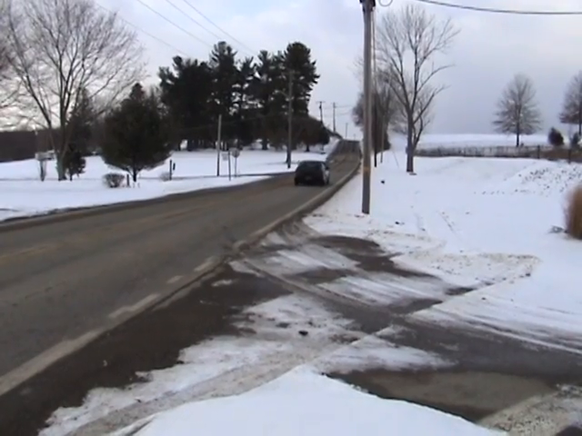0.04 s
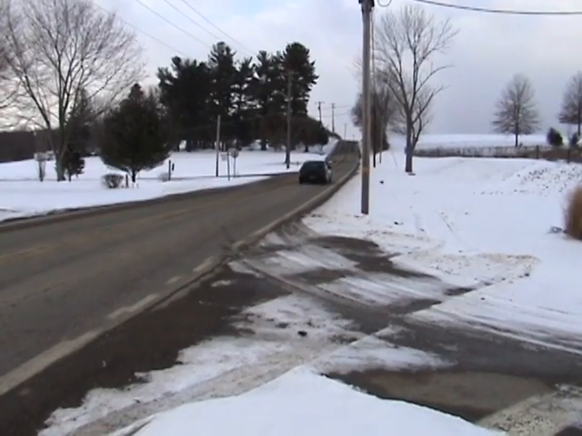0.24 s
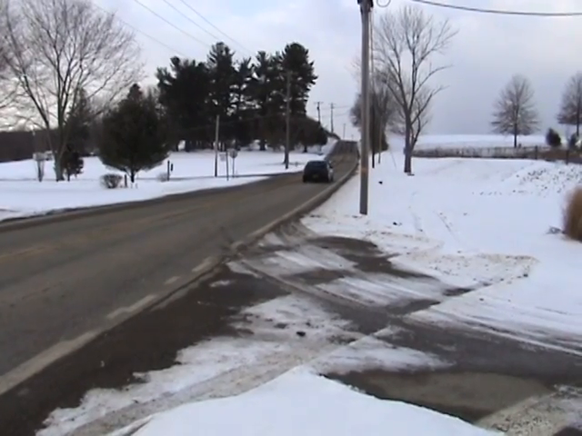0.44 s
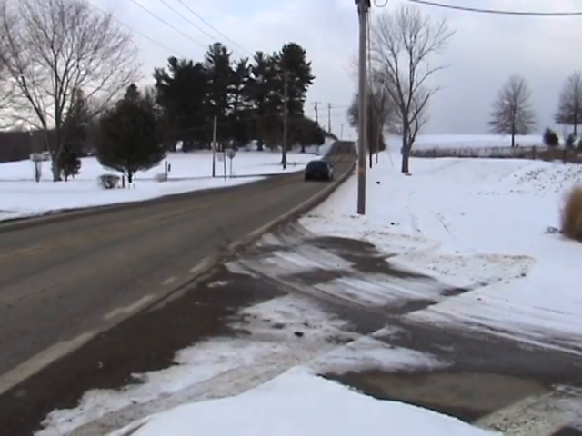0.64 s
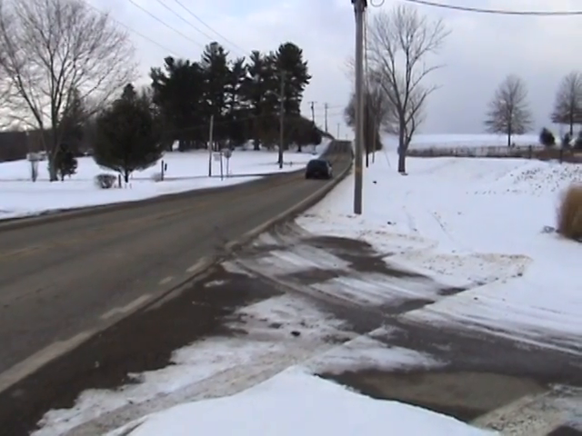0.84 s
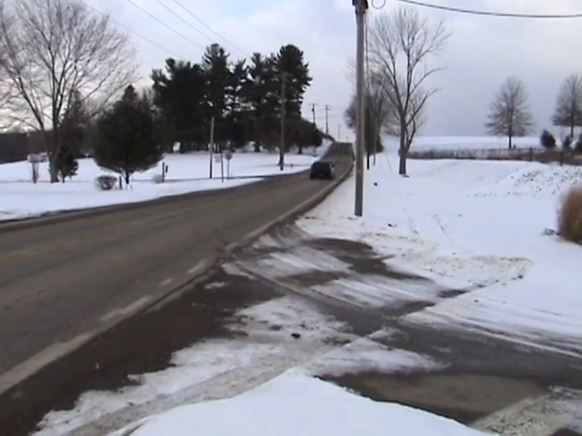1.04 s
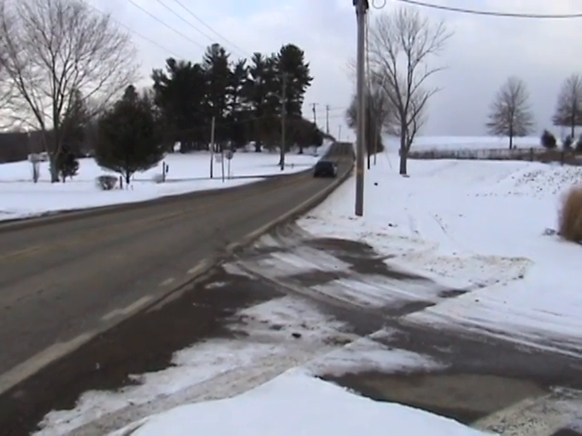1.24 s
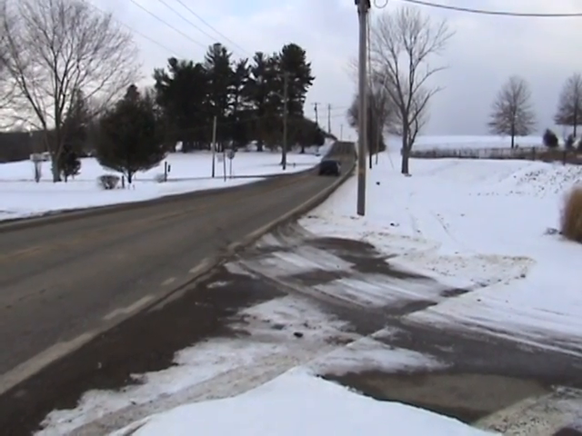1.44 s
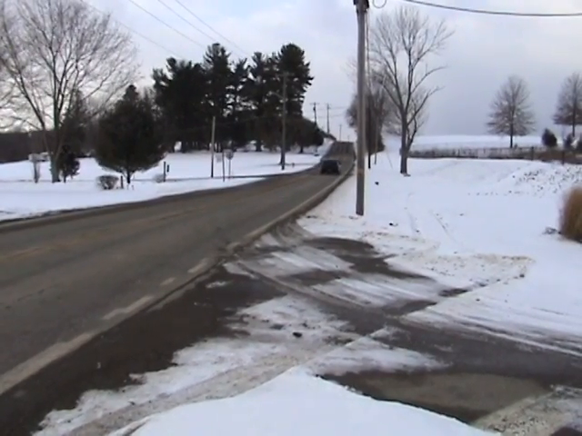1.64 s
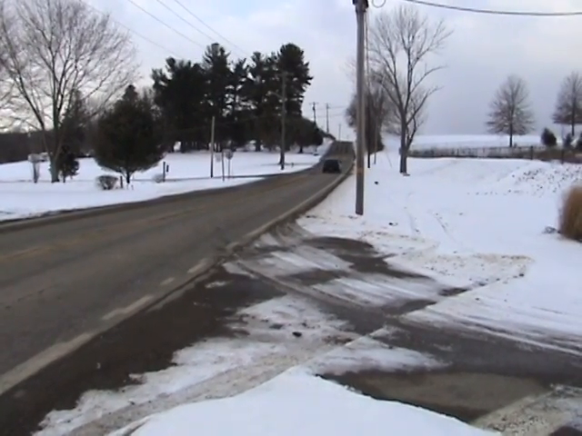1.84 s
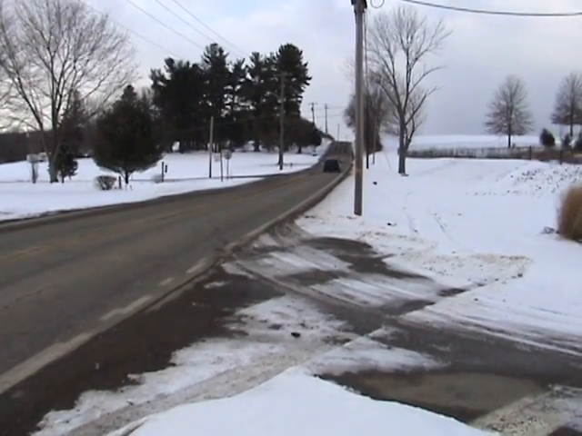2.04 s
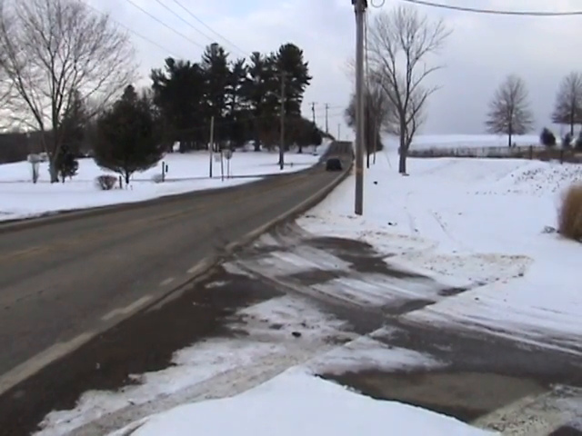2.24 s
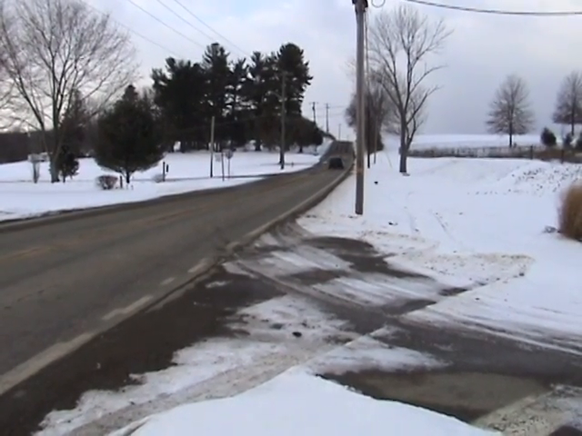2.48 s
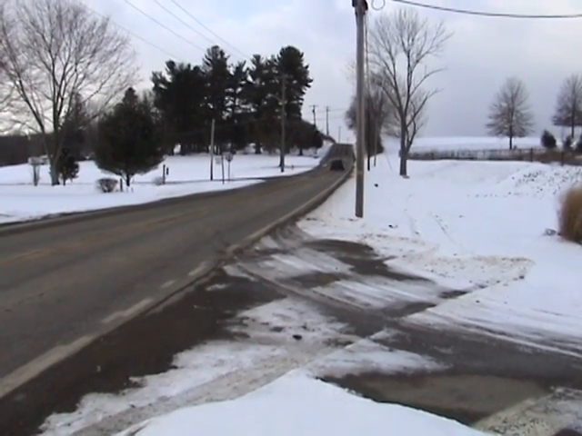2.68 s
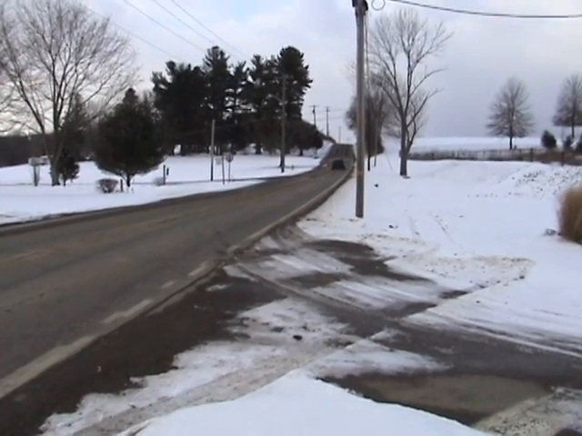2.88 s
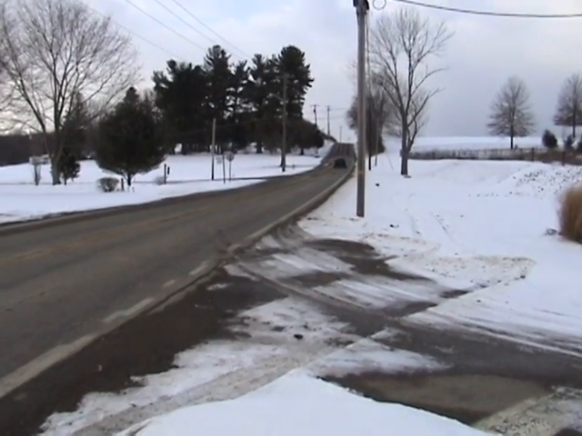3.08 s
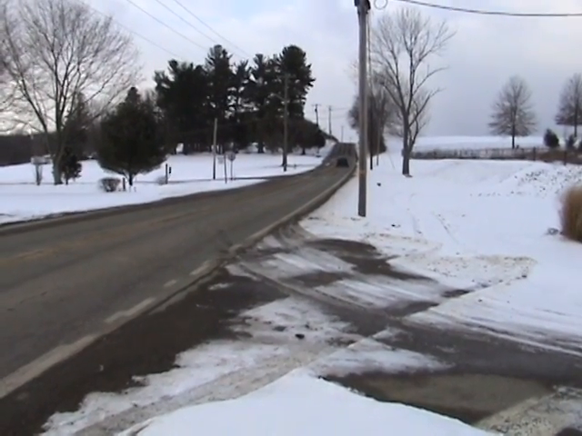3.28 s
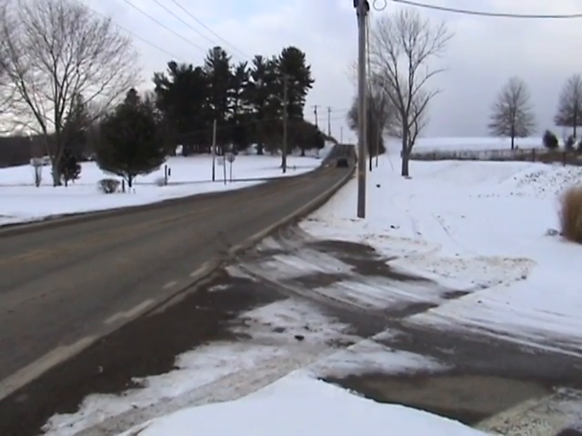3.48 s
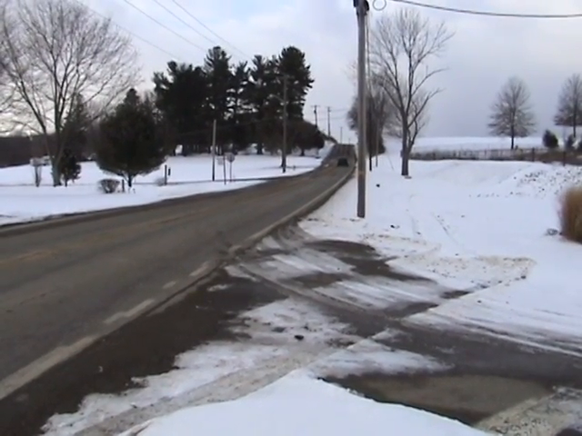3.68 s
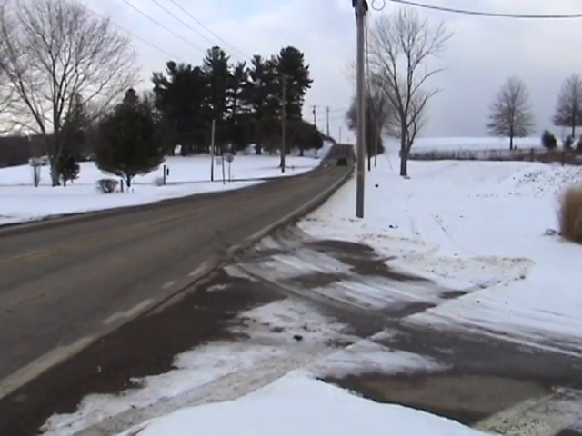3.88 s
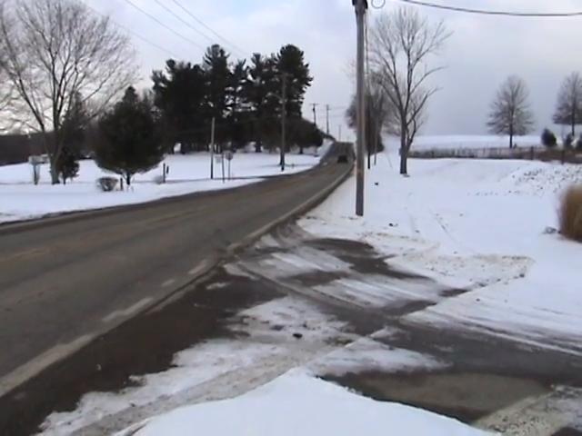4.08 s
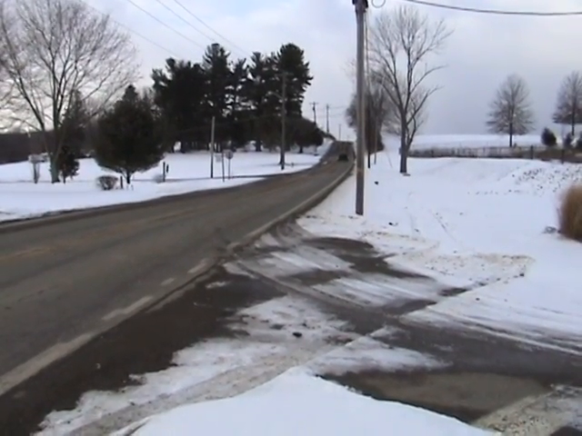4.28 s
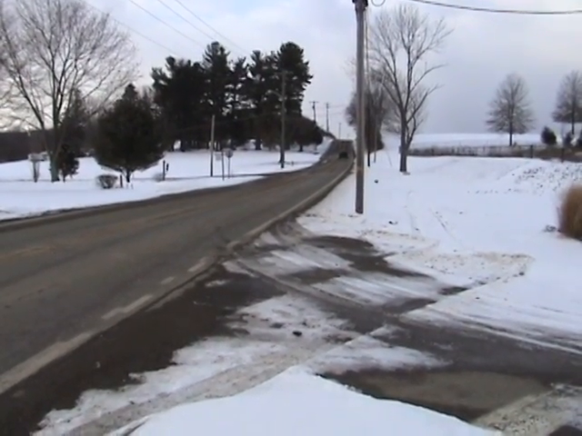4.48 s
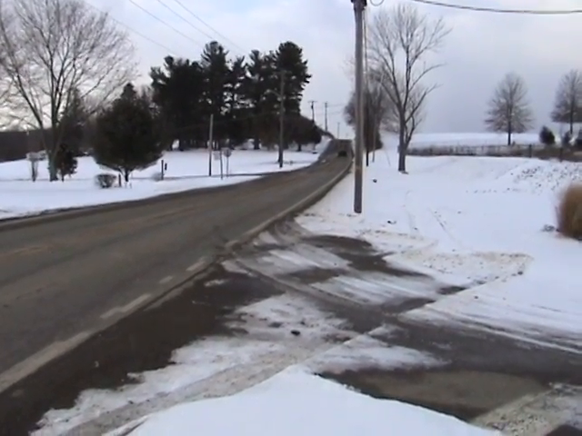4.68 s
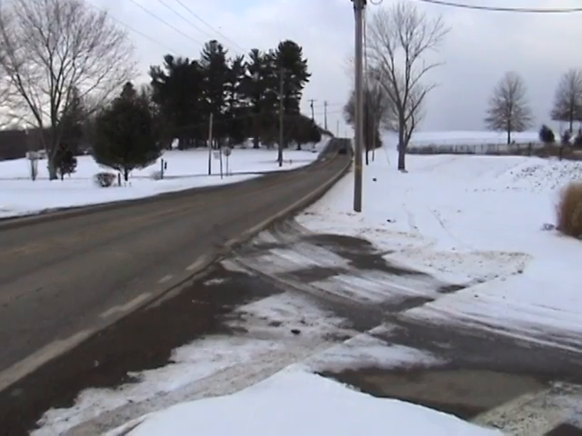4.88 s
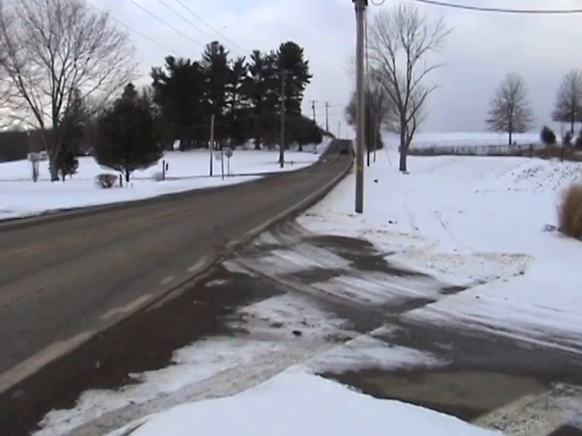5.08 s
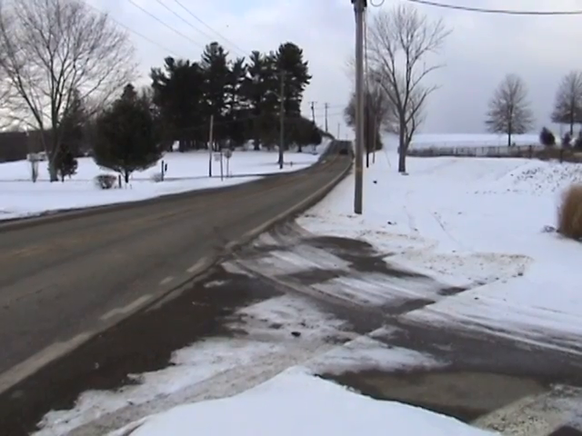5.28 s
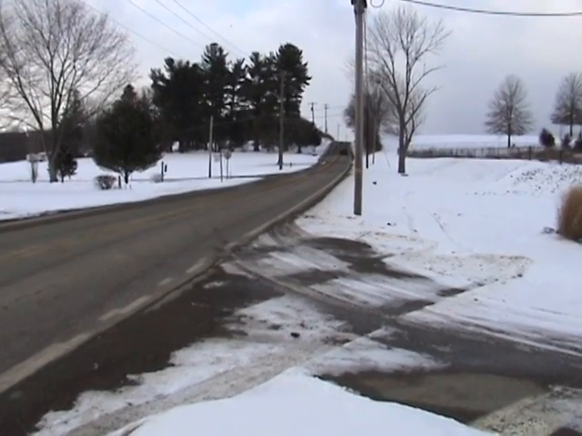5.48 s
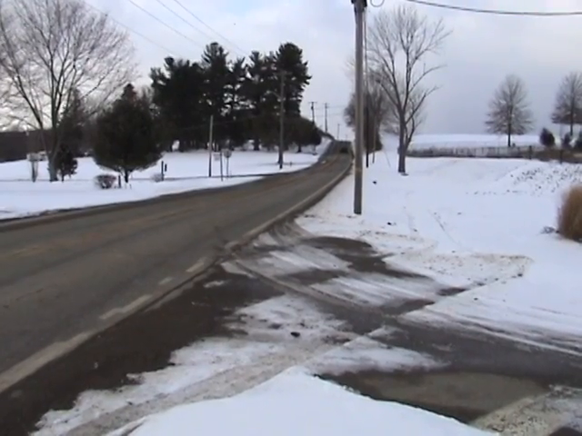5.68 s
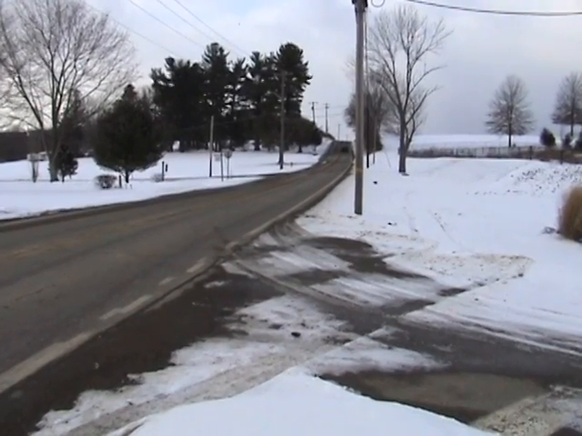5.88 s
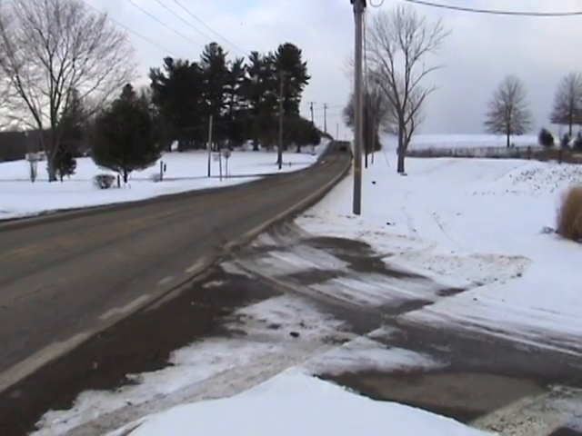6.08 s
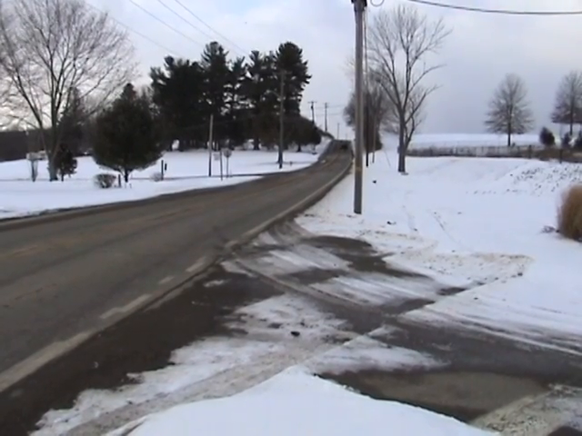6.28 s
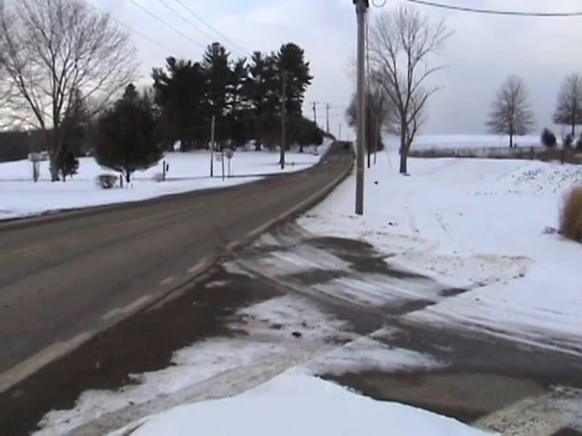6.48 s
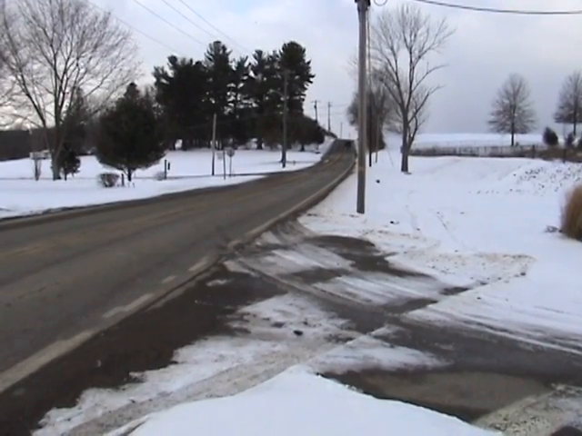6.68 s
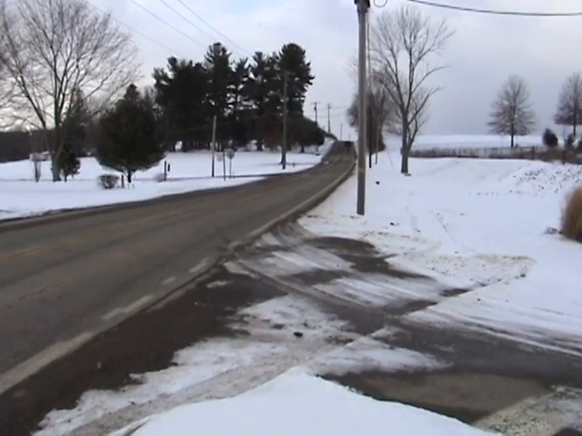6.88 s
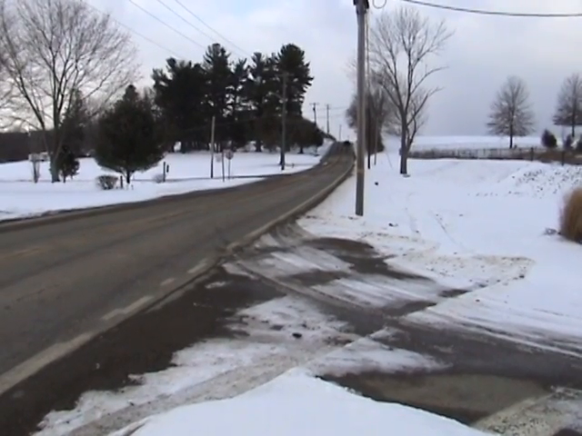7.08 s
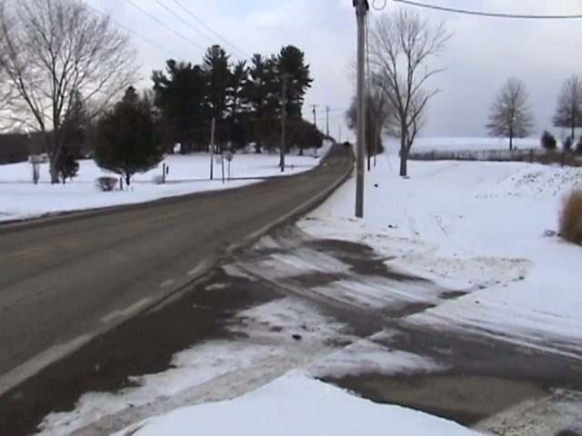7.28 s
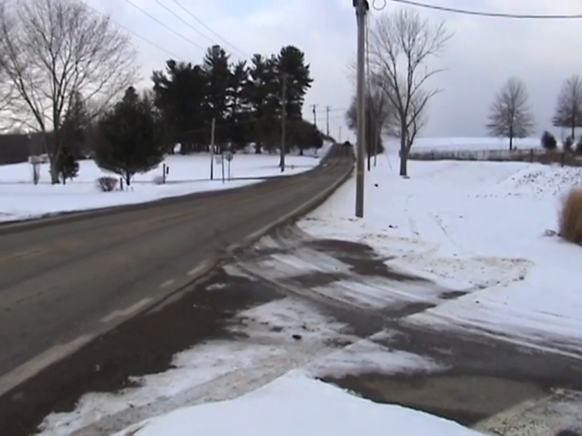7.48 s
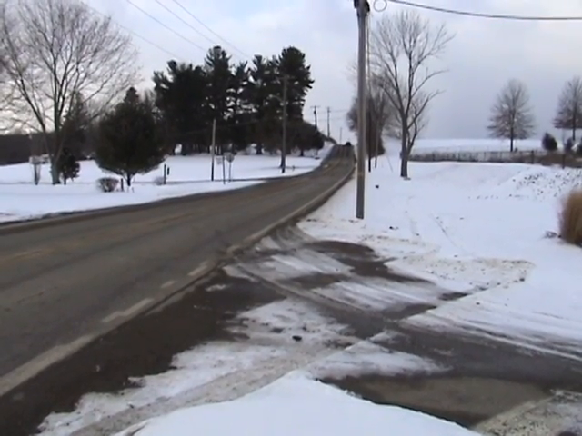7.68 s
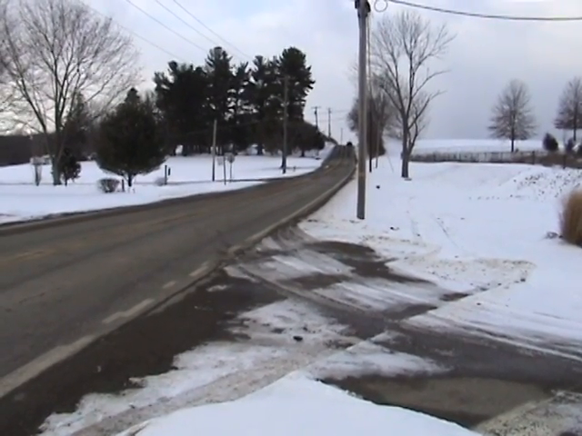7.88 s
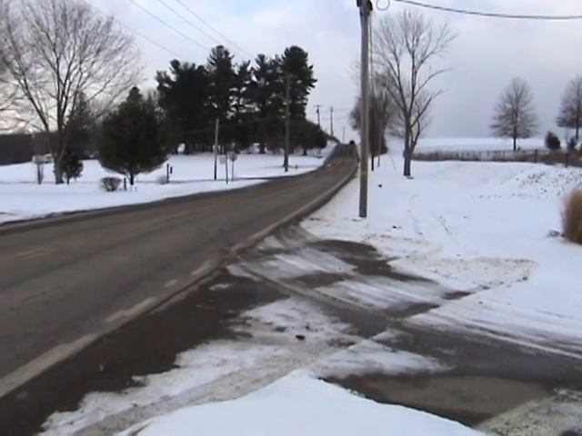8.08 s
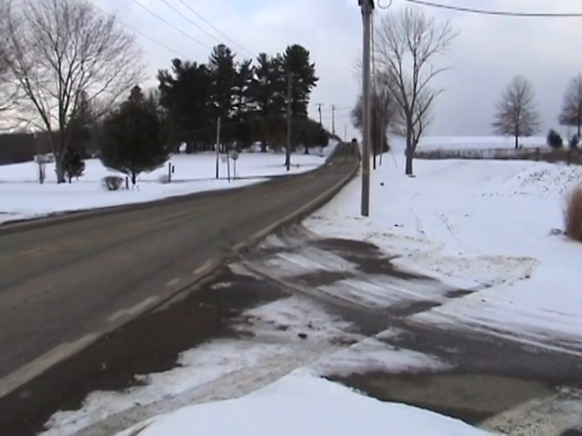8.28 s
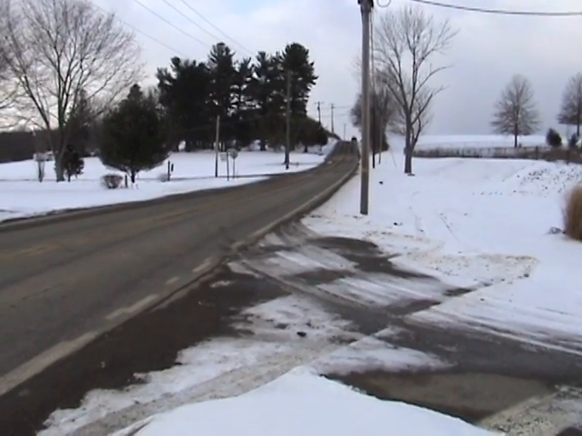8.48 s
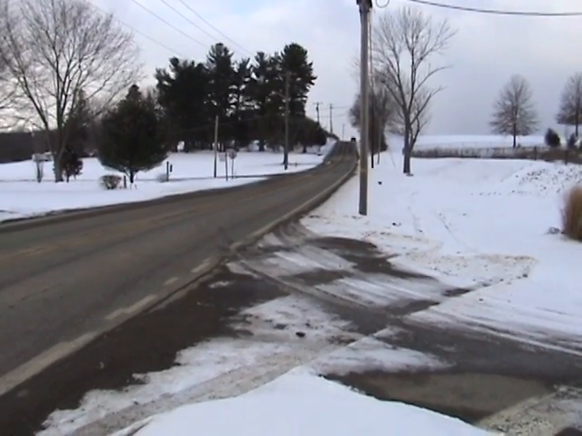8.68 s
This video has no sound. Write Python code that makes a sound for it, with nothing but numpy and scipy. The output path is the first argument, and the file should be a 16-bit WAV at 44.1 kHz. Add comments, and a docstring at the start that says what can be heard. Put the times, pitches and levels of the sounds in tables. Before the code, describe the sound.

A four-cylinder car is heard from two microphones close behind its tailpipe, travelling with it. From 0 to 0.8 s the exhaust is lumpy and limping, with fast, sharp pops each engine cycle. It climbs steadily to 2.75 s, booming, raspy and crackling. The throttle closes at about 2.8 s: the note breaks up and drops, wind thumps, and between 3.0 and 3.3 s the pipe rattles metallically amid pops. Jerky surges follow until 3.6 s, then a second, smoother pull rises to 4.85 s. A crack and hollow thuds mark the lift near 4.9 s; a weaker, lumpy note continues, popping at 5.35 s and dipping sharply at 5.5 s. A low burble returns around 6 s and fades by 6.6 s. The rest is quiet cruise with soft single barks from 6.9 s, tyre roar, growing low wind buffeting and a bright grit tick at 8.2 s. Reflections are short and diffuse.

```python
"""Turbocharged car, close to the tailpipe

A four-cylinder car on the road, heard close behind by a pair of microphone ports. It pulls hard through two gears,
surges and rattles as the clutch bites, pops, then settles into a burbling cruise. Firing clicks and puffs of noise
ring filters for the pipe, split into boom, burble, bark, rasp, roar and crackle; noise bursts make pops and rattles.
Behind the car lie tyre roar and wind on the microphone, both of shaped noise, and short diffuse reflections.
"""
import sys
import numpy as np
from scipy import signal
from scipy.fft import rfft, irfft, next_fast_len
from scipy.io import wavfile
from scipy.ndimage import uniform_filter1d

SR = 44100
rng = np.random.default_rng(int(sys.argv[2]) if len(sys.argv) > 2 else 0)


def unload_audio(sound):
    """Save the sound as a 16-bit wav file, at the path given as the first command line argument."""
    columns = np.transpose(np.atleast_2d(sound))
    # keep every value between -1 and 1, then stretch to whole-number steps
    steps = np.round(np.clip(columns, -1, 1) * 32767)
    wavfile.write(sys.argv[1], SR, steps.astype(np.int16))


N = 385434
TIME = np.arange(N) / SR

# All levels in the tables are relative: each layer adds its own gain.
# Road and wind
# roar of the tyres: (t/s, level/dB)
TYRE_LEVEL = [(0, -37), (2.7, -35), (4.9, -35), (5.55, -36.5), (7.3, -37.5), (7.6, -39.5), (8.74, -38)]
# wind on the microphone: (t/s, level/dB)
WIND_LEVEL = [(0, -49), (2.5, -49), (2.84, -34.5), (3, -39.5), (4.5, -54), (5.55, -46), (6.5, -50.5),
              (7.35, -41.5), (7.6, -37), (8.2, -34), (8.74, -35.5)]
# spectrum of the tyre roar: (f/Hz, level/dB)
TYRE_SPECTRUM = [(120, -76), (250, -14.5), (450, -4), (650, -5.5), (850, -2.5), (1200, -5.5), (1420, 0.5),
                 (1670, -6.5), (2100, -14.5), (2700, -21), (3200, -26.5), (3650, -39), (4500, -41),
                 (5500, -48), (8000, -52.5), (16000, -59.5)]
# spectrum of the wind: (f/Hz, level/dB)
WIND_SPECTRUM = [(10, -8), (28, -1), (52, -1), (80, -6), (130, -17), (200, -28), (500, -50), (2000, -100)]

# Knocks
# grit flicked against the body: (t/s, level/dB)
GRIT_TICKS = [(6.645, -50.5), (8.239, -27.5)]
# ring of the bodywork under grit: (f/Hz, level/dB)
BODYWORK = [(1470, -16.5), (2500, -7), (3380, -16.5), (3720, -7), (6290, -20.5), (6810, -9.5), (8510, -34),
            (14000, -42)]
# the pipe rattles as the gear bites: (t/s, level/dB)
RATTLES = [(3.017, -34), (3.054, -16.5), (3.059, -29.5), (3.077, -23.5), (3.088, -23), (3.095, -24),
           (3.104, -20.5), (3.116, -32), (3.192, -26), (3.228, -27), (3.247, -18)]
# ring of the rattling pipe: (f/Hz, level/dB)
RATTLING_PIPE = [(1200, -28.5), (2000, -6), (2450, 9), (2800, 0.5), (3200, 4), (3800, -10.5), (4500, -15),
                 (9000, -43)]

# Engine motion and driving
# engine speed: (t/s, rate/firings per s)
REVS = [(0, 81.41), (.45, 88.11), (.95, 97.18), (1.1, 100.93), (1.55, 112.68), (1.8, 120.14), (2.2, 131.86),
        (2.6, 143.71), (2.82, 140.12), (3.29, 104.72), (3.65, 106.81), (4.2, 114.2), (4.68, 120.53),
        (4.85, 117.9), (5.07, 123.54), (5.44, 109.71), (5.6, 85.89), (7.15, 80.65), (8.74, 74.03)]
START_TURN = .662  # engine cycles on the count at the start
# the driveline shudders after the clutch bites: the engine swings ahead and behind, in engine cycles
SHUDDER_START_S, SHUDDER_HZ, SHUDDER_TURNS, SHUDDER_FADE_S = 3.385, 6.3, .03, .25
# how the engine is driven: (t/s, lope/0-1, coasting/0-1, cruise colour/0-1)
DRIVE = [(0, 1, 0.6, 0.24), (.45, 0.99, 0.1, 0.08), (.9, 0.66, 0.06, 0.04), (1.5, 0.43, 0.32, 0.08),
         (2.7, 0.4, 0, 0.3), (3.15, 0.5, 0.5, 0.02), (3.32, 0.36, 0.19, 0.08), (4.1, 0.3, 0.36, 0.03),
         (4.8, 0.17, 0.33, 0.06), (5.1, 1, 0.69, 0.39), (6.2, 0.91, 0.5, 0.25), (6.58, 1, 0.8, 0.98),
         (6.68, 1, 0.08, 0.98)]
# how hard the engine works: (t/s, exhaust level/dB)
EFFORT = [(0, -14), (.35, -15), (.62, -20), (1, -14.5), (2.15, -11), (2.76, -15.5), (2.85, -22),
          (2.98, -25), (3.15, -23), (3.46, -22), (3.7, -15.5), (4.3, -15.5), (4.83, -16.5), (4.93, -26.5),
          (5.04, -30.5), (5.42, -25), (5.55, -50), (5.75, -40), (5.92, -28.5), (6.1, -27.5), (6.24, -28),
          (6.33, -36.5), (6.6, -50), (6.68, -40), (6.93, -51.5), (6.98, -43.5), (8, -36.5), (8.74, -39.5)]
# surges of power as the clutch takes up the next gear:
# (middle t/s, length/s, boost level/dB, extra rasp level/dB, extra crackle level/dB)
SURGES = [(3.052, 0.11, 3.5, -5, -1), (3.191, 0.028, 2.5, -8, 1), (3.243, 0.041, 6.5, 5, 4),
          (3.383, 0.11, 6, 11, -3), (3.564, 0.12, 2.5, 6.5, 6)]
# the throttle closes and the firing turns ragged: (start t/s, end t/s, misfiring/0-1)
LIFTS = [(2.774, 3.282, 0.7), (4.9, 5.047, 0.7), (5.45, 5.794, 1), (6.399, 6.804, 0.15)]
LIFT_FADE_S = 0.16  # each fade is centred on the start or end of the lift

# Cylinders
# one row a cylinder: (place/cycle, shift when limping/cycle, place when cruising/cycle,
# share of the pulse that comes again on the beat when limping/ratio)
STROKES = [(.062, .005, .03, 0), (.312, .01, .275, 0), (.561, -.078, .545, .8), (.811, -.072, .735, 1.1)]
# one row a cylinder: (level under load/dB, level when loping/dB, level when cruising/dB, front steepness level/dB)
CYLINDERS = [(17.5, 8, 8, -0.5), (15.5, 5, 17, 3), (21, 1, 17.5, 5), (8, 6.5, 19.5, 5.5)]
# how far the cylinders match in strength: (t/s, match/0-1)
EVENNESS = [(0, 0), (.8, 0), (1, 1), (1.22, 1), (1.45, 0.2), (2.3, 0.6), (3.15, 0), (3.35, 1), (4.1, 0.9),
            (4.85, 1), (5, 0.04)]
# two cylinders arrive early through their short header: (t/s, limp/0-1)
LIMP = [(0, 0.96), (.25, 0.94), (.55, 0.47), (.8, .15), (1.2, 0.07), (2.7, 0.13), (3.3, 0.01), (4.3, 0.04),
        (4.8, 0.17), (5.1, 0.68), (6.6, 0.34)]
# colour of the short header: (f/Hz, level/dB)
SHORT_HEADER = [(100, 0), (250, -0.5), (400, 0.5), (520, 2.5), (680, 4.5), (1000, 3), (2000, 2.5)]

# Low exhaust
# the pipe with the throttle open: (f/Hz, level/dB)
PIPE_PULL = [(35, -65), (60, -11.5), (89, -14.5), (138, 6), (178, -15.5), (230, 10), (302, -5.5),
             (335, 6.5), (377, -2.5), (430, 0), (510, 5), (575, 4.5), (670, 7.5), (740, -1), (810, -9.5),
             (994, -2), (1100, -10), (1400, -4.5), (2000, -28), (2290, -24.5), (3500, -49), (4550, -53),
             (7700, -120)]
# the pipe on light throttle: (f/Hz, level/dB)
PIPE_CRUISE = [(35, -47.5), (60, -22.5), (102, -36.5), (139, 7.5), (172, -24.5), (192, -10.5), (215, 3.5),
               (247, -11), (403, -15), (451, -26), (518, 1.5), (866, -28), (1200, -41.5), (1560, -75),
               (2640, -120)]
# the booming low orders: multiples of the engine cycle rate
BOOM_ORDERS = (3, 4, 5, 7, 8, 11, 12)
# one row an order: (level under load/dB, loping level/dB, coasting level/dB, cruising level/dB, misfiring level/dB)
BOOM_LEVELS = [(-36.5, -21, -14.5, -14, -20.5), (-16.5, -4.5, -9.5, 2.5, -14),
               (-27.5, -17.5, -15.5, -15, -16), (-52.5, -16.5, -6, -2, -19.5), (1, -14, -30, -16, -16.5),
               (-31.5, -14.5, -28.5, -2.5, -23.5), (-9.5, -12, -11.5, -18, -20.5)]
# resonances of the pipe that the orders sweep through: (f/Hz, level/dB)
STANDING_WAVES = [(75, -16.5), (90, -6.5), (120, -7), (143, 1), (160, 5.5), (180, 1.5), (200, 2.5),
                  (222, 7.5), (245, 8), (272, 4), (300, -1), (325, 0), (345, 4), (368, -3.5), (420, 1.5)]
BOOM_FOLLOW = 0.81  # dB of boom per dB of effort
BOOM_RAGGED = 1.35  # how fully misfiring takes over the weights of the orders
BOOM_FLUTTER_DB, RAGGED_FLUTTER_DB = 1.03, 7  # each order wavers by chance, more so when misfiring
FULL_EFFORT_DB = -15
BURBLE_DB, BURBLE_LOPE_DB, BURBLE_FOLLOW = -28, 2.5, 0.41  # at full effort, gain when loping, dB per dB of effort
LOPE_GAS = 0.23  # extra turbulence while the engine lopes under load
# ragged firing sets the whole pipe booming: (middle t/s, length/s, level/dB)
HOLLOWS = [(2.821, 0.027, -24.5), (2.953, 0.14, -35), (3.061, 0.075, -18), (3.199, 0.036, -24),
           (3.258, 0.056, -28.5), (4.973, .07, -22.5)]
# spectrum of that hollow boom: (f/Hz, level/dB)
HOLLOW_PIPE = [(70, -27.5), (115, -6.5), (142, 21), (185, -6.5), (238, 8.5), (300, -12.5), (420, -6),
               (560, -1.5), (680, -6), (760, -7.5), (840, 0.5), (1000, -20), (2000, -66.5)]

# High exhaust
# treble against the effort: (t/s, rasp level/dB, crackle level/dB)
TREBLE = [(0, -14, -38), (.35, -7.5, -32), (.62, -2.5, -27), (.8, 0.5, -19), (1.05, -4, -32),
          (1.3, -5, -26), (1.6, -5.5, -20.5), (1.95, -11.5, -32), (2.3, -8.5, -28), (2.7, -12, -34.5),
          (2.95, -19, -40), (3.4, -20, -44), (3.8, -10, -32), (4.2, -9, -31), (4.65, -9, -36.5),
          (4.85, -5, -43), (5.3, -8.5, -53), (6.1, -13, -68.5), (8.74, -33.5, -62)]
# ring of the tailpipe: (f/Hz, level/dB)
RASP = [(800, 9), (900, 3.5), (990, 6), (1150, -3.5), (1270, 2), (1360, 9.5), (1450, 3.5), (1600, 4.5),
        (1750, -1.5), (1950, -14), (2300, -1.5), (2600, -19.5), (2900, -12.5), (3600, -20.5), (5000, -31)]
# steady rush of gas from the tailpipe: (f/Hz, level/dB)
ROAR = [(800, -26.5), (1100, 2), (1500, 1.5), (1950, -7.5), (2350, -4), (2800, -8.5), (3500, -16),
        (6000, -31), (16000, -60.5)]
# colour of the gas crackle: (f/Hz, level/dB)
CRACKLE = [(1500, -4.5), (2500, 4.5), (3000, 4), (3500, -6.5), (3950, 0.5), (4700, -4.5), (5200, -8.5),
           (6300, -6.5), (7800, -13), (10500, -20), (13700, -30), (16000, -33)]
RASP_SHUT_RATE, RASP_OPEN_RATE = 105, 120  # firings per second: upper ring at its dullest, and neutral
RASP_OPEN_DB_PER_RATE = 0.08  # change of the upper ring per firing per second from neutral
RASP_FLICKER_DB, CRACKLE_FLICKER_DB = 2, 3  # the treble comes in uneven spurts
# hiss between the shocks, and its growth with each firing per second above SPRAY_RATE
SPRAY_FLOW, SPRAY_FLOW_PER_RATE, SPRAY_RATE = .06, 0.025, 102

# Pops and barks
# single sharp reports in the tailpipe: (t/s, crack level/dB, blast level/dB)
POPS = [(0.232, -17, -32), (.3975, -15, -29), (.4435, -15, -33.5), (.488, -20, -26), (0.533, -13.5, -18.5),
        (0.5773, -18.5, -22.5), (0.6226, -13, -25.5), (0.6434, -10.5, -27), (0.6663, -11.5, -28.5),
        (0.7096, -14.5, -36), (0.8034, -20, -17), (.8142, -17, -28.5), (.8245, -13.5, -22),
        (0.855, -14, -23.5), (0.898, -14.5, -23.5), (1.1413, -13.5, -32.5), (1.1512, -9, -25.5),
        (1.19, -15, -27.5), (1.2565, -13.5, -24.5), (1.333, -15.5, -24.5), (1.3695, -12.5, -23.5),
        (1.3795, -11.5, -25.5), (2.8763, -29.5, -19), (3.025, -37.5, -30), (3.055, -15, -16.5),
        (3.0868, -26.5, -22), (3.104, -35, -25.5), (3.1934, -33, -24.5), (3.2276, -33, -22.5),
        (3.247, -18, -19), (3.3728, -16, -24), (3.4011, -22.5, -24), (3.4104, -17.5, -14.5),
        (3.6004, -19, -15.5), (4.058, -16, -18), (4.8687, -15, -15), (4.9029, -33.5, -16),
        (4.971, -54, -32), (5.071, -49.5, -29.5), (5.3536, -27, -15.5), (5.3895, -34, -19)]
# runs in which one cylinder pops on every cycle:
# (start t/s, end t/s, place/cycle, crack level/dB, blast level/dB)
AFTERFIRE = [(.17, .44, 0.51, -15, -23), (.45, .8, .52, -6.5, -16), (.9, 1.8, 0.54, -24.5, -29),
             (.98, 1.8, 0.61, -23.5, -33), (3.5, 3.85, 0.57, -25.5, -24), (3.72, 4.5, 0.34, -23.5, -39),
             (4.28, 4.86, 1, -41.5, -31), (4.15, 4.86, 0.01, -42, -22.5), (4.74, 4.861, 0.63, -27.5, -28.5),
             (5.09, 5.335, .25, -52, -24)]
AFTERFIRE_SPREAD_DB = 1.5
# snap at the tailpipe mouth: (f/Hz, level/dB)
SNAP = [(600, -44), (1000, -32.5), (1400, 7), (1950, 1.5), (2400, -6), (3000, -4), (3700, -14.5),
        (5000, -34), (9000, -74.5)]
# thud from the silencer: (f/Hz, level/dB)
THUD = [(60, -37), (150, -1), (300, -8), (550, 10), (720, 6.5), (1000, -2.5), (1500, -23), (3000, -88.5)]
# barks of single cylinders on light throttle:
# (start t/s, end t/s, place/cycle, peak level at the start/dB, peak level at the end/dB)
CHUFFS = [(6.933, 8.103, 0.26, -21, -33), (6.953, 8.742, 0.83, -33.5, -36),
          (7.348, 8.745, .545, -30.5, -23.5)]
# spectrum of a bark: (f/Hz, level/dB)
CHUFF = [(150, -30.5), (290, 3.5), (345, 0.5), (400, 6), (450, -8.5), (520, -6), (565, 0), (615, 5),
         (650, -2.5), (690, -1), (780, -11), (1200, -25), (2500, -48.5), (5000, -90)]

# Microphone
# phase between the two ports: (f/Hz, left lead/rad)
PORT_PHASE = [(0, -0.6), (340, -1.13), (950, -1.07), (1210, -0.53), (2410, -0.71), (2900, -0.28),
              (16000, 0.65)]
EDGE_HZ = 16100  # top of the recorded band


def amp(db):
    """Decibels to gain."""
    return 10 ** (np.asarray(db) / 20)


def unit(x):
    """Scales to rms 1."""
    return x / np.sqrt(np.mean(x ** 2) + 1e-20)


def curves(rows):
    """The columns of a timed table, sample by sample."""
    s, *columns = np.transpose(rows)
    return [np.interp(TIME, s, column) for column in columns]


def read(points, hz):
    """A spectrum read on a log-frequency axis."""
    f, value = np.transpose(points)
    return np.interp(np.log(hz + 1), np.log(f + 1), value)


def add(mix, s, sound):
    """Mixes a sound in at s seconds."""
    part = mix[max(round(s * SR), 0):][:len(sound)]
    part += sound[:len(part)]


def ring(points, size=4096):
    """The causal, minimum-phase impulse response of a body with this spectrum, at unit energy."""
    level_db = np.maximum(read(points, abs(np.fft.fftfreq(size, 1 / SR))), -90)
    log_gain = np.log(amp(level_db))
    response = np.fft.ifft(np.exp(np.conj(signal.hilbert(log_gain)))).real[:size // 2]
    return response / np.linalg.norm(response)


def colour(x, points):
    """Passes x through a body with this spectrum."""
    return signal.oaconvolve(x, ring(points))[:N]


def band(x, lo_hz, hi_hz):
    """A band of x, with its pulses left in place."""
    sections = signal.butter(3, [lo_hz, hi_hz], btype="band", fs=SR, output="sos")
    return signal.sosfiltfilt(sections, x)


def smooth(x, size):
    """Two passes of a running mean."""
    return uniform_filter1d(uniform_filter1d(x, size), size)


def steady(x, size=2400):
    """Holds the rms near 1 over a few engine cycles, keeping each pulse's shape."""
    return x / np.sqrt(abs(smooth(x ** 2, size)) + 1e-14)


def waver(size=1800):
    """Smooth chance of rms 1 that changes over an engine cycle or two."""
    knots = np.arange(0, N + size, size)
    return unit(np.interp(np.arange(N), knots, rng.standard_normal(len(knots))))


def swell(s, length):
    """A flat-topped swell around s seconds."""
    return np.exp(-(2 * (TIME - s) / length) ** 4)


def port_noise(points, apart):
    """Coloured noise at two ports: a shared part plus a separate part for each."""
    shared, *separate = [unit(colour(rng.standard_normal(N), points)) for _ in range(3)]
    return shared + apart * np.array(separate)


def wind(apart=1.0, gust_db=2.8):
    """Lumpy low noise of air at the microphone, partly different at each port and stronger on the left."""
    gusts = amp(gust_db * unit(smooth(rng.standard_normal(N), 3000)))
    buffet = unit(gusts * port_noise(WIND_SPECTRUM, apart))
    return amp(curves(WIND_LEVEL)) * buffet * amp([[2.], [-2.5]])


def tyres(apart=0.043, drift_db=.7):
    """Tyre roar: drifting broadband noise, nearly the same at both ports."""
    drift = amp(drift_db * waver(size=5000))
    return amp(curves(TYRE_LEVEL)) * drift * unit(port_noise(TYRE_SPECTRUM, apart))


def scatter(x, t60=0.47, delay_s=0.0014, size=8192):
    """Short diffuse reflections from the road and the underbody, as decaying noise tails."""
    t = np.arange(size) / SR
    tails = rng.standard_normal((2, size)) * amp(-60 * t / t60) * (t > delay_s)
    return signal.oaconvolve(x[None], tails / np.linalg.norm(tails[0]), axes=1)[:, :N]


def knocks(rows, body, decay_s):
    """Short scuffs of noise that ring a body: the rattling pipe, or grit on the bodywork."""
    out, t, response = np.zeros(N), np.arange(1024) / SR, ring(body)
    for s, level_db in rows:
        scuff = rng.standard_normal(len(t)) * np.exp(-t / decay_s)
        knock = signal.fftconvolve(scuff, response)
        add(out, s, amp(level_db) * knock / abs(knock).max())
    return out


def engine_turns():
    """Engine cycles counted sample by sample; every cylinder fires once in each."""
    since = np.maximum(TIME - SHUDDER_START_S, 0)
    shudder = SHUDDER_TURNS * np.exp(-since / SHUDDER_FADE_S) * np.sin(2 * np.pi * SHUDDER_HZ * since)
    return np.cumsum(curves(REVS)[0]) / SR / len(CYLINDERS) + START_TURN + shudder


def cycle_times(place):
    """The seconds at which each engine cycle reaches this place."""
    turns = engine_turns()
    return np.interp(np.arange(int(turns[-1]) + 1) + place, turns, TIME)


def chuffs(spread_db=2.0):
    """On light throttle single cylinders bark above the rest, each once a cycle."""
    out, bark = np.zeros(N), ring(CHUFF)
    bark = bark / abs(bark).max()
    for start, end, place, first_db, last_db in CHUFFS:
        times = cycle_times(place)
        for s, luck in zip(times, rng.standard_normal(len(times))):
            if start < s < end:
                level_db = np.interp(s, (start, end), (first_db, last_db)) + spread_db * luck
                add(out, s, -amp(level_db) * bark)
    return out


def afterfire():
    """One pop per engine cycle through each run, uneven in strength: rows like those of POPS."""
    rows = []
    for start, end, place, crack_db, blast_db in AFTERFIRE:
        times = cycle_times(place)
        luck_db = AFTERFIRE_SPREAD_DB * rng.standard_normal(len(times))
        rows += [(s, crack_db + db, blast_db + db / 2) for s, db in zip(times, luck_db) if start <= s <= end]
    return rows


def pops(snap_db=-1.5, thud_db=12.0, crack_s=0.0012):
    """Unburnt fuel goes off in the pipe: a crack of gas, a snap at the mouth and a thud from the silencer."""
    out, t = np.zeros(N), np.arange(2048) / SR
    fizz, snap, thud = ring(CRACKLE), ring(SNAP), ring(THUD)
    for s, crack_db, blast_db in list(POPS) + afterfire():
        crack = signal.fftconvolve(rng.standard_normal(len(t)) * np.exp(-t / crack_s), fizz)
        for level_db, sound in (crack_db, crack), (blast_db + snap_db, snap), (blast_db + thud_db, thud):
            add(out, s, -amp(level_db) * sound / abs(sound).max())
    return out


def surges():
    """Each surge is a swell: its dB of power, of extra rasp and of extra crackle."""
    return sum(np.outer(boosts_db, swell(s, length)) for s, length, *boosts_db in SURGES)


def misfiring():
    """Raggedness fades in as the throttle closes and out as it opens."""
    ragged = np.zeros(N)
    for start, end, share in LIFTS:
        inside = np.minimum(TIME - start, end - TIME)
        ragged += share * np.clip(inside / LIFT_FADE_S + .5, 0, 1)
    return np.clip(ragged, 0, 1)


def firings(turns, lope, misfire, cruise, jitter=.0004, stumble=0.034, spread_db=.7, misfire_db=5):
    """One click per exhaust stroke, a track for each cylinder; unequal header pipes make the beat limp."""
    tracks, cycles = np.zeros((len(STROKES), N + 1)), np.arange(int(turns[-1]) + 1)
    uneven = 1 - np.clip(curves(EVENNESS)[0], 0, .9)
    limp = curves(LIMP)[0] * (1 - cruise)
    for clicks, stroke, strengths in zip(tracks, STROKES, CYLINDERS):
        place, shift, cruise_place, again = stroke
        load_db, lope_db, cruise_db, _ = strengths
        at = np.minimum(np.searchsorted(turns, cycles + place), N - 1)
        late, strong = rng.standard_normal((len(cycles), 2)).T
        beat = cycles + place + (cruise_place - place) * cruise[at]
        beat += late * (jitter + stumble * misfire[at])
        level_db = (load_db + (lope_db - load_db) * lope[at]) * uneven[at]
        level_db += (cruise_db - level_db) * cruise[at]
        level_db += strong * (spread_db + misfire_db * misfire[at])
        for turn, share in (beat + shift * limp[at], 1), (beat, again * limp[at] ** 2):
            height = share * amp(level_db) * (turn > turns[0]) * (turn < turns[-1])
            # each click is split between the two nearest samples
            exact = np.interp(turn, turns, np.arange(N))
            whole = exact.astype(int)
            clicks[whole] -= height * (1 - exact % 1)
            clicks[whole + 1] -= height * (exact % 1)
    return tracks[:, :N]


def jet(clicks, decay_s, between):
    """Turbulent gas: a puff of noise after each click, over a weak steady flow."""
    gate = signal.lfilter([1], [1, -np.exp(-1 / (decay_s * SR))], abs(clicks))
    return steady((unit(gate) + between) * rng.standard_normal(N))


def boom(pipe, turns, lope, coast, cruise, misfire, width_hz=7, slip=0.91):
    """Splits off the low orders, which swell and fade across the pipe's standing waves; misfiring breaks them up."""
    lowpass, tones = signal.butter(2, width_hz, fs=SR, output="sos"), np.zeros(N)
    cycle_hz = np.gradient(turns) * SR
    ragged = np.clip(BOOM_RAGGED * misfire, 0, 1)
    for order, (level_db, lope_db, coast_db, cruise_db, misfire_db) in zip(BOOM_ORDERS, BOOM_LEVELS):
        for share, state_db in (lope, lope_db), (cruise, cruise_db), (coast, coast_db), (ragged, misfire_db):
            level_db = level_db + share * (state_db - level_db)
        level_db += read(STANDING_WAVES, order * cycle_hz)
        level_db += (BOOM_FLUTTER_DB + RAGGED_FLUTTER_DB * ragged) * np.minimum(waver(), 1)
        # shift the order to 0 Hz, keep what is slow, and shift it back
        spin = np.exp(2j * np.pi * order * turns)
        swing = signal.sosfiltfilt(lowpass, pipe / spin, padtype="even", padlen=SR // 4) * spin
        pipe = pipe - 2 * swing.real
        tones += np.sqrt(2) * amp(level_db) * np.cos(np.angle(swing) + slip * ragged * waver())
    return tones, pipe


def low_exhaust(drive, turns, effort_db, lope, coast, cruise, misfire, cruise_bark_db=-6):
    """Boom, burble and bark: the pipe rung by the drive, shared between its pulling and cruising colours."""
    pipe = (1 - cruise) * colour(drive, PIPE_PULL) + cruise * colour(drive, PIPE_CRUISE)
    tones, pipe = boom(pipe, turns, lope, coast, cruise, misfire)
    out = amp(BOOM_FOLLOW * effort_db) * tones
    burble_db = BURBLE_DB + BURBLE_LOPE_DB * lope + BURBLE_FOLLOW * (effort_db - FULL_EFFORT_DB)
    out += amp(burble_db) * steady(band(pipe, 140, 366))
    out += amp(effort_db + cruise_bark_db * cruise) * steady(band(pipe, 357, 936))
    hollow = sum(amp(db) * swell(s, length) for s, length, db in HOLLOWS)
    return out + hollow * steady(colour(drive, HOLLOW_PIPE), size=1200)


def rasp_and_roar(fronts, puffs, misfire, spurts, rasp_db=-4.0, roar_db=-12):
    """Steep pulse fronts ring the tailpipe, its upper ring opening with the revs, over a rush of gas."""
    buzz = band(colour(steady(fronts) + (.04 + .3 * misfire) * puffs, RASP), 740, 4000)
    upper = band(buzz, 2000, 3400)
    above_neutral = np.maximum(curves(REVS)[0], RASP_SHUT_RATE) - RASP_OPEN_RATE
    opening = amp(RASP_OPEN_DB_PER_RATE * above_neutral)
    flicker_db = RASP_FLICKER_DB * spurts
    rush = unit(colour(rng.standard_normal(N), ROAR))
    return amp(rasp_db + flicker_db) * steady(buzz + (opening - 1) * upper) + amp(roar_db + flicker_db) * rush


def crackle(fronts, spurts, spread_db=4, shock_share=0.38):
    """Some fronts steepen into shocks, each with a brief spray of gas noise; more hiss fills in as revs rise."""
    shocks = fronts * amp(spread_db * np.clip(rng.standard_normal(N), -2, 1))
    flow = SPRAY_FLOW + SPRAY_FLOW_PER_RATE * np.maximum(curves(REVS)[0] - SPRAY_RATE, 0)
    spray = jet(shocks, decay_s=0.0008, between=flow)
    sizzle = band(colour(spray + shock_share * steady(shocks), CRACKLE), 2600, 18000)
    return amp(CRACKLE_FLICKER_DB * spurts) * steady(sizzle, size=4000)


def exhaust():
    """Firing pulses and gas puffs ring the pipe; low, rasping and crackling layers follow the effort."""
    turns, misfire = engine_turns(), misfiring()
    lope, coast, cruise = curves(DRIVE)
    surge_db, *bite_db = surges()
    effort_db = curves(EFFORT)[0] + surge_db
    rasp_gain, crackle_gain = amp(np.array(curves(TREBLE)) + effort_db + np.array(bite_db))
    tracks = firings(turns, lope, misfire, cruise)
    # the last two cylinders pass through the short header
    clicks = tracks[:2].sum(0) + colour(tracks[2:].sum(0), SHORT_HEADER)
    puffs = jet(clicks, decay_s=0.019, between=0.19)
    gas = .045 + LOPE_GAS * lope * (1 - coast) * (1 - cruise) + .5 * misfire
    drive = steady(clicks) + gas * puffs
    fronts = amp([row[-1] for row in CYLINDERS]) @ tracks
    spurts = np.clip(waver(size=2600), -1, 1)
    out = low_exhaust(drive, turns, effort_db, lope, coast, cruise, misfire)
    out += rasp_gain * rasp_and_roar(fronts, puffs, misfire, spurts)
    return out + crackle_gain * crackle(fronts, spurts)


def ports(both):
    """A phase lead by frequency between the ports, half to each side, and a slight level difference."""
    size = next_fast_len(N + 2048)
    lead = np.interp(np.fft.rfftfreq(size, 1 / SR), *np.transpose(PORT_PHASE))
    turned = rfft(both, size) * np.exp(.5j * np.array([lead, -lead]))
    return irfft(turned, size)[:, :N] * amp([[.4], [.2]])


def scene(wet_db=-20, near_db=-9):
    """The road and the car at a pair of close microphone ports."""
    car = knocks(GRIT_TICKS, BODYWORK, decay_s=0.0022) + knocks(RATTLES, RATTLING_PIPE, decay_s=0.0017)
    car += chuffs() + pops() + exhaust()
    reflections = amp(wet_db) * scatter(band(car, 210, 15000))
    reflections += amp(near_db) * scatter(band(car, 2700, 16000), t60=0.014, delay_s=0.00054)
    return ports(wind() + tyres() + reflections + car)


def record(dry, knee=0.94):
    """The loudest pulses flatten towards full scale; then the band limit."""
    over = np.maximum(abs(dry) - knee, 0)
    clipped = dry - np.sign(dry) * (over - (1 - knee) * np.tanh(over / (1 - knee)))
    lowpass = signal.firwin(255, EDGE_HZ, window=("kaiser", 9), fs=SR)
    return signal.oaconvolve(clipped, lowpass[None], "same")


dry = scene()
out = record(dry)
unload_audio(out)
```